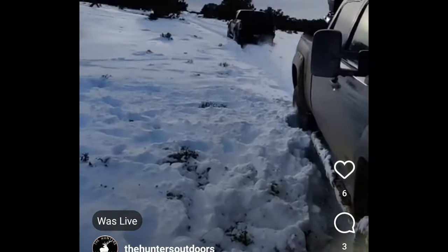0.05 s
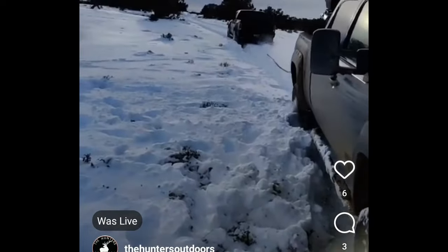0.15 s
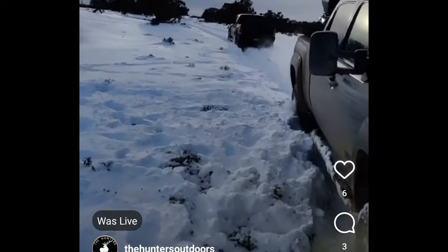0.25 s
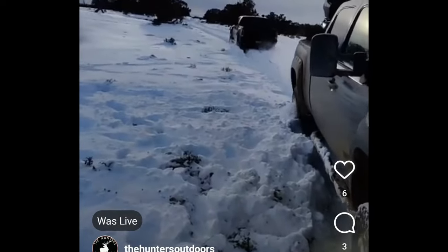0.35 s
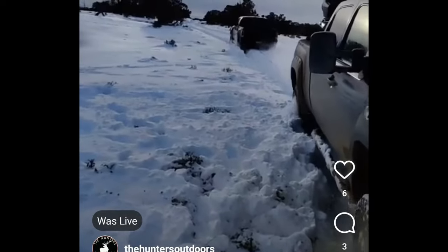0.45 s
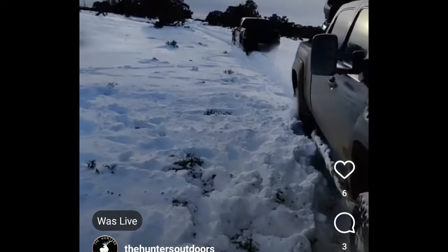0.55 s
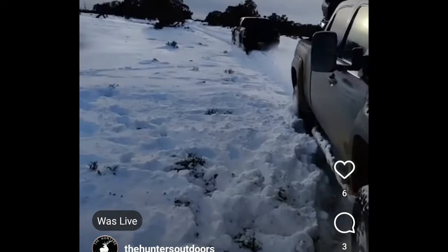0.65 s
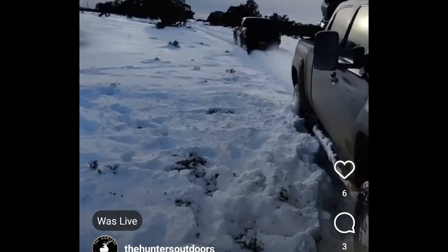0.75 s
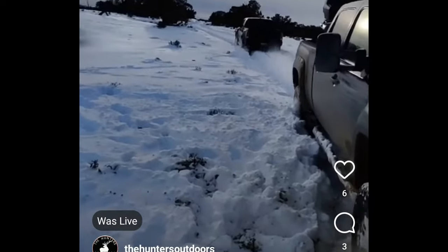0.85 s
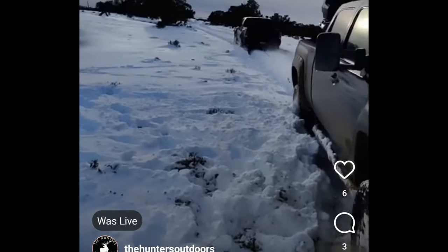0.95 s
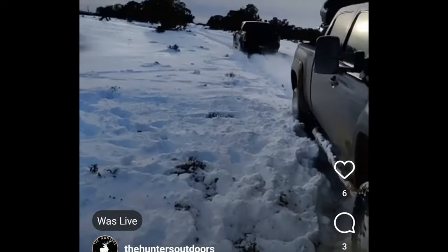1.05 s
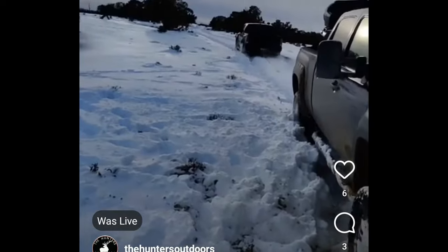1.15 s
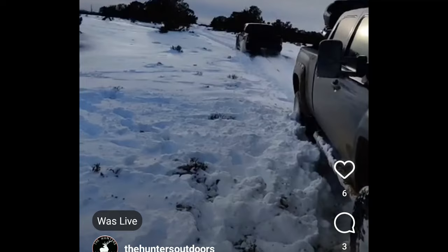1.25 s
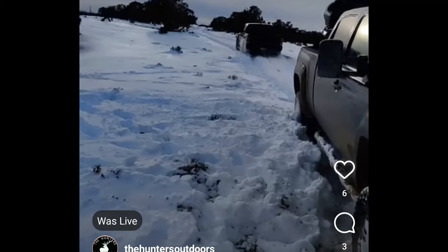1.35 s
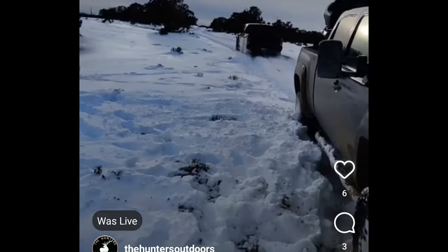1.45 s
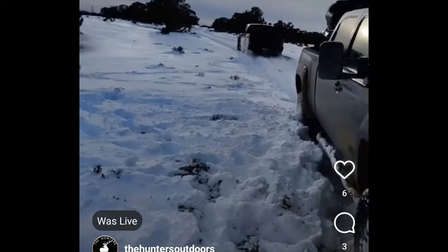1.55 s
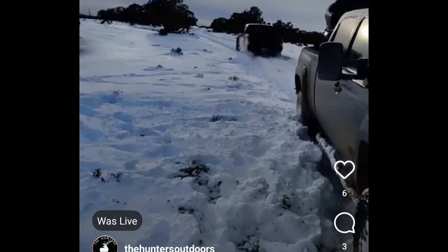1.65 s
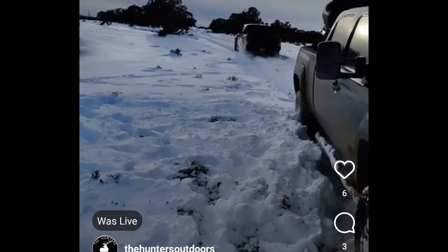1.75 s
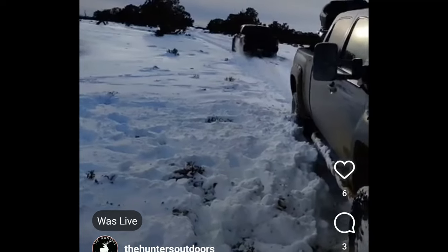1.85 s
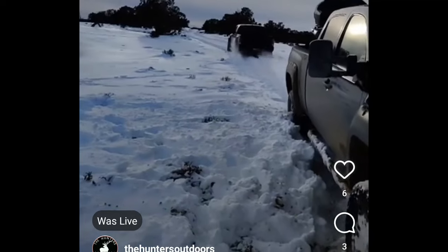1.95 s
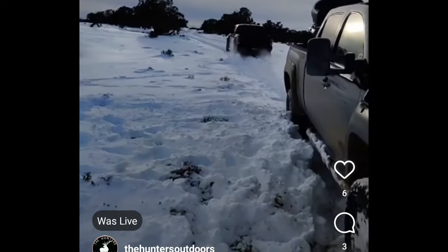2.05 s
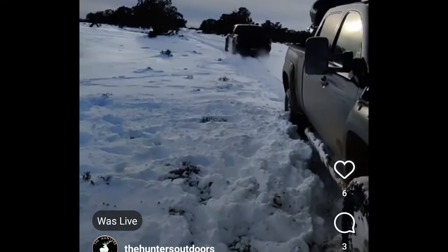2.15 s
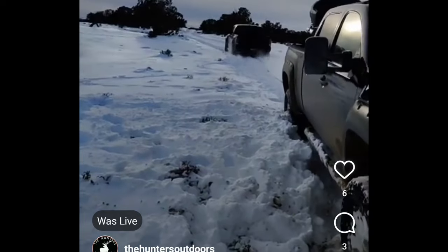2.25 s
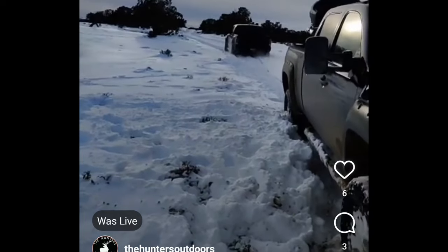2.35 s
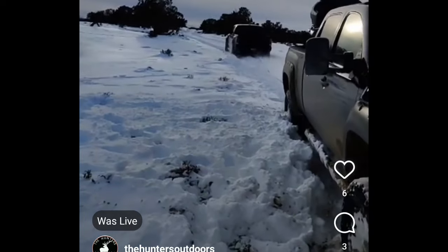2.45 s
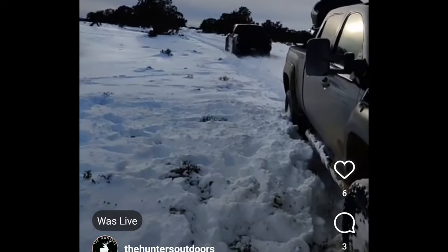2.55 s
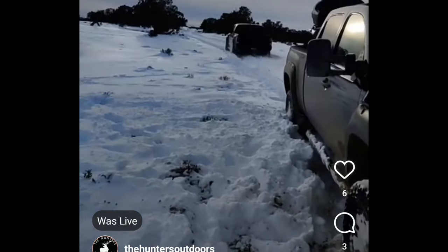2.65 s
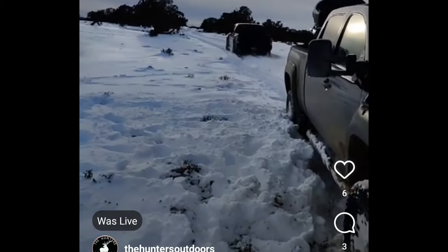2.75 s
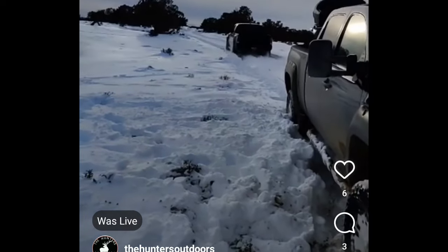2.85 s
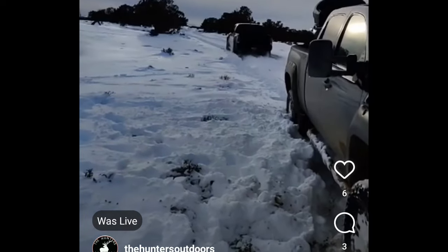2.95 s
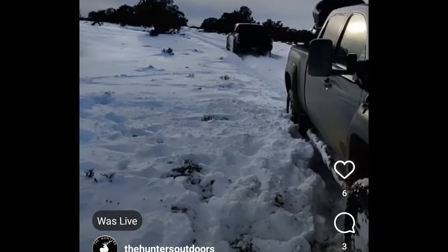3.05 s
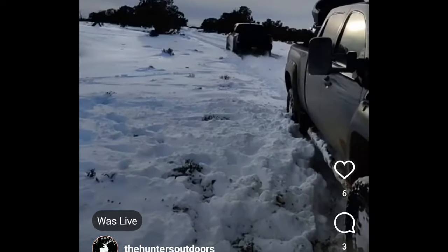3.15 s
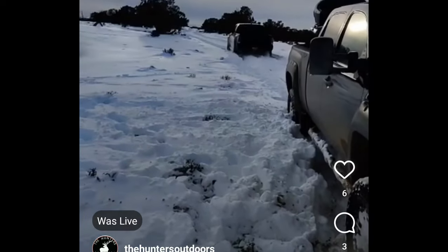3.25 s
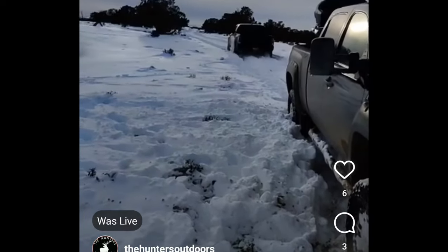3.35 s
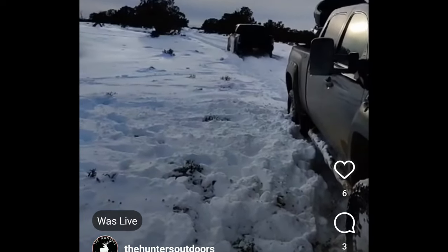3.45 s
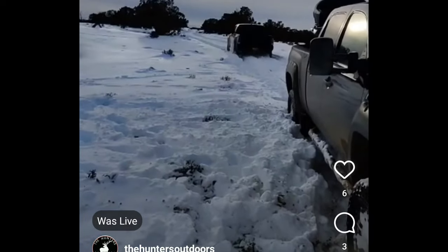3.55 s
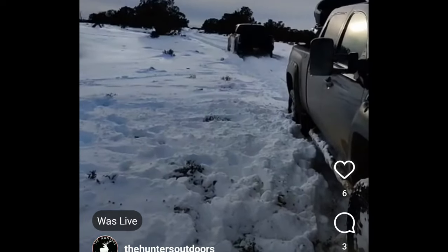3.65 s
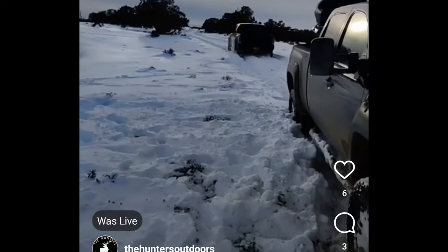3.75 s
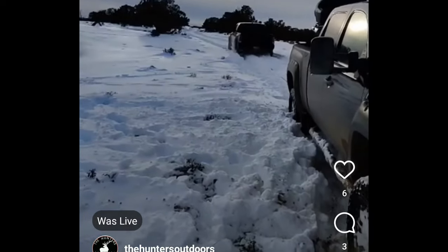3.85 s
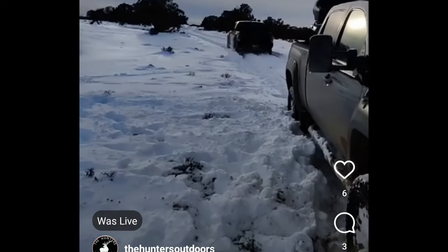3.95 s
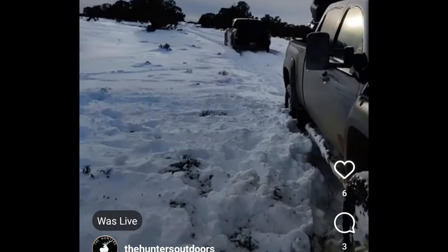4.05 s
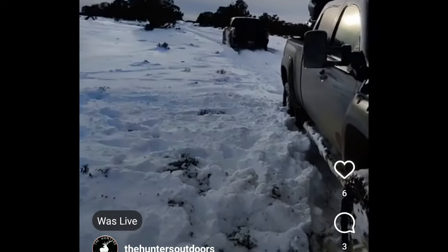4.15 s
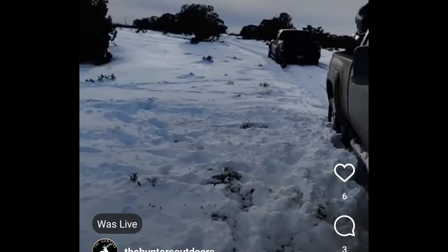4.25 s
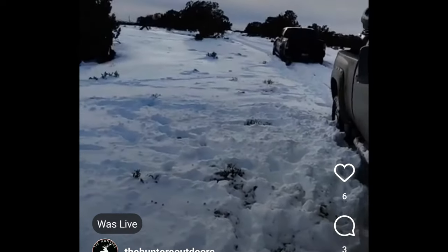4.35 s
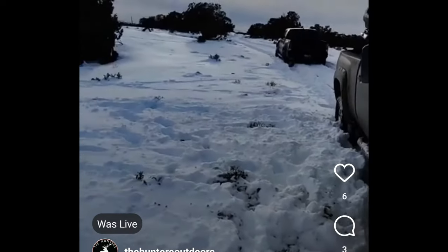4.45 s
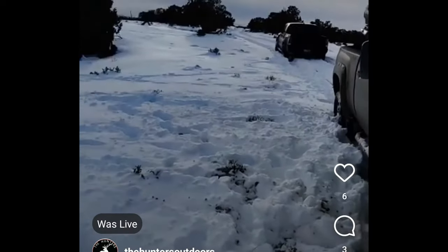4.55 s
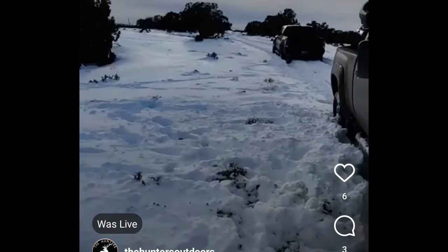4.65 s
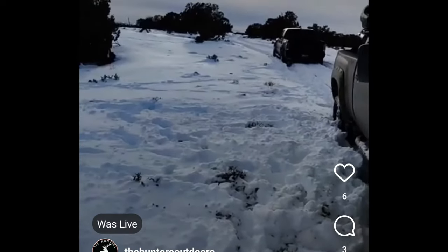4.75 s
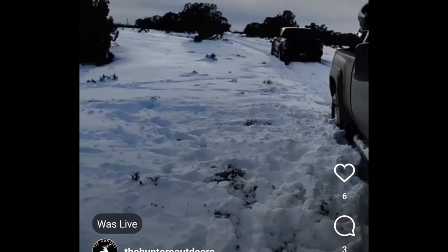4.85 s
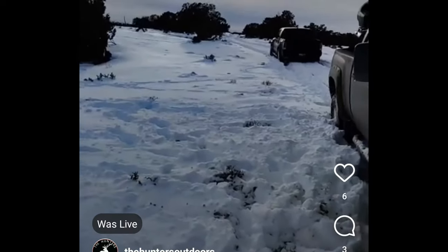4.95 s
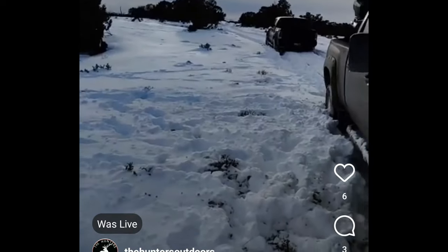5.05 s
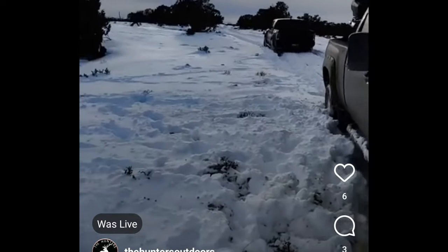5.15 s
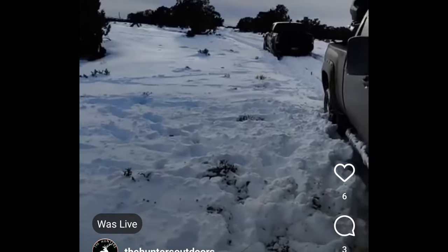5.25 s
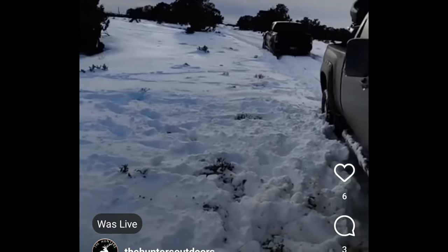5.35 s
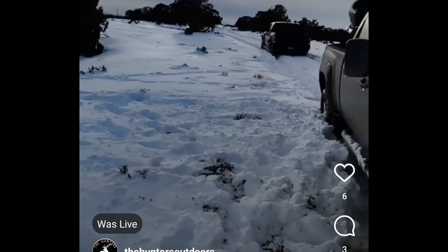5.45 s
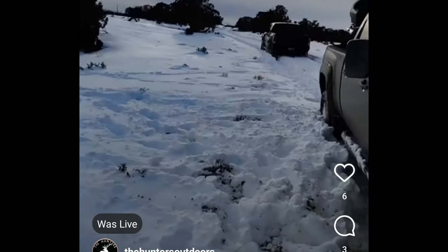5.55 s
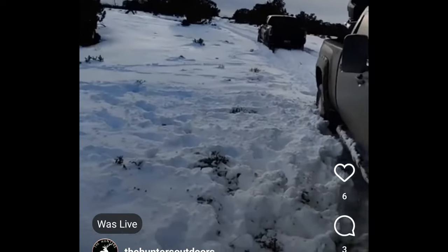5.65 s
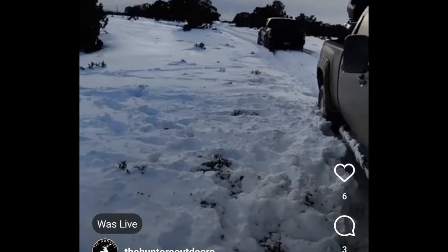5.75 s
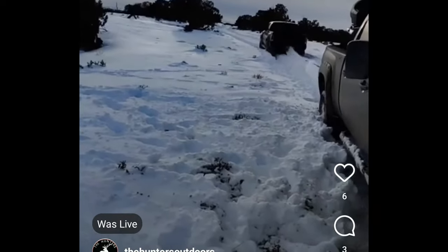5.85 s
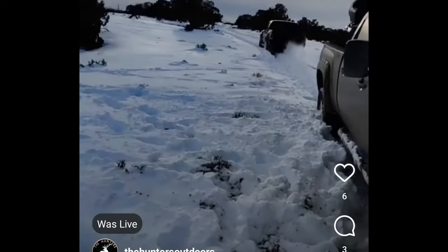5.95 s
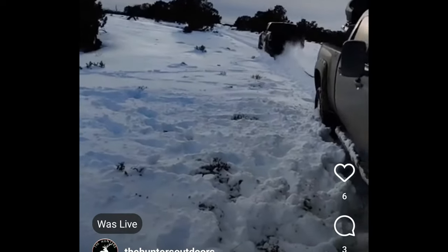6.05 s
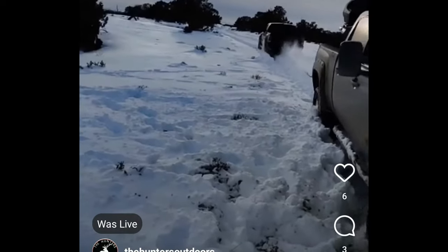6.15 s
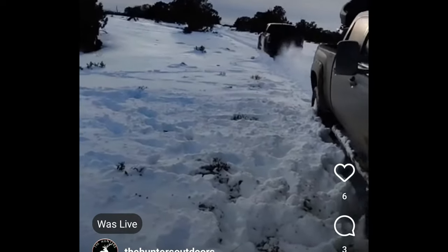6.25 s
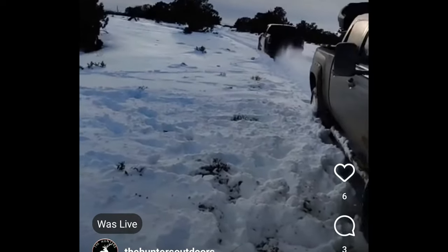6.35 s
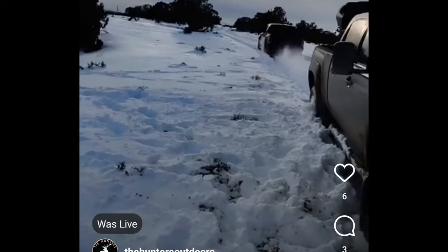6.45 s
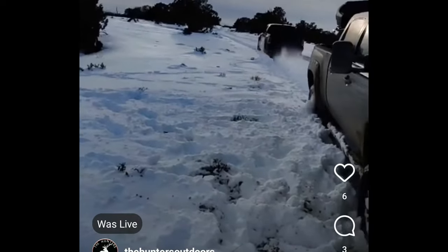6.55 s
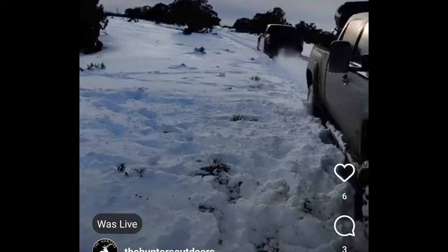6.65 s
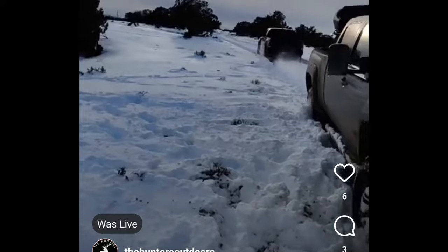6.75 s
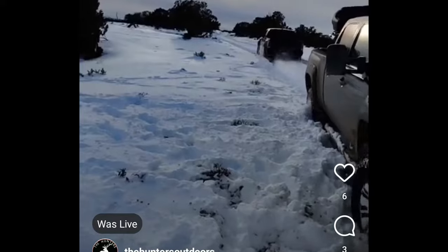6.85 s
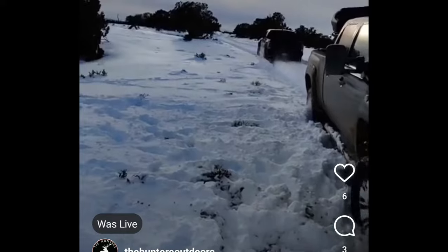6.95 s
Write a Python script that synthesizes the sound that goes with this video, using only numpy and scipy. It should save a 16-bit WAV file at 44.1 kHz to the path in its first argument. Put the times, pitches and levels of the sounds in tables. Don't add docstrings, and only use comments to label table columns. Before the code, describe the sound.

A stuck pickup revs and bogs in deep snow, tyres churning and spraying hiss, with strap clunks and wind thumps, then pulls again.

```python
import sys
import numpy as np
from scipy import signal
from scipy.io import wavfile
from scipy.ndimage import uniform_filter1d

SR = 44100
rng = np.random.default_rng(int(sys.argv[2]) if len(sys.argv) > 2 else 0)


def decibels_to_gain(level_db):
    exponent = np.asarray(level_db, float) / 20
    return 10 ** exponent


def file_out(sig):
    cols = np.atleast_2d(sig).T
    lim = np.clip(cols, -1, 1)
    pcm = np.round(lim * 32767).astype(np.int16)
    wavfile.write(sys.argv[1], SR, pcm)


N = 308788

# time in seconds, level in dB below full load.
ENGINE_LOAD = [
    [(0.0, -15), (0.16, -15), (0.3, -14), (0.5, -7.5), (1.06, 0), (1.6, 1.5), (2.4, -2), (3.0, -4),
     (3.6, -7.5), (3.95, -14.5), (4.25, -11.5)],
    [(4.254, -27), (4.55, -24), (5.29, -11), (5.92, -1.5), (6.2, -10), (6.6, -2.5), (7.0, -0.5)],
]


def evened(x):
    return x / np.sqrt(np.mean(x ** 2) + 1e-20)


def played(tables):
    s, *columns = np.vstack(tables).T
    t = np.arange(N) / SR
    return [np.interp(t, s, column) for column in columns]


def framed(table, size):
    s, *columns = np.transpose(table)
    t = np.arange(4 * N // size + 5) * size / 4 / SR
    return [np.interp(t, s, column) for column in columns]


def drift(hz):
    knots = uniform_filter1d(np.repeat(rng.standard_normal(1200), 8), size=8)
    return evened(np.interp(np.arange(N) * 16 * hz / SR, np.arange(len(knots)), knots))


def span(t0, t1, fade):
    t = np.arange(N) / SR
    return np.clip(np.minimum(t - t0, t1 - t) / fade, 0, 1)


def swells(rows):
    t = np.arange(0, N + 32, 32) / SR
    gain = 0
    for s, db, rise, fall in rows:
        gain = gain + decibels_to_gain(db - 20 * ((t - s) / np.where(t < s, rise, fall)) ** 2)
    return np.interp(np.arange(N) / SR, t, gain)


def tone(turns, db, wobble_db, wobble_hz):
    strength = decibels_to_gain(db + wobble_db * drift(wobble_hz))
    return np.sqrt(2) * strength * np.cos(2 * np.pi * (turns + rng.random()))


def gated(turns, depth):
    return evened(1 - depth + 3 * depth * np.exp(-3 * (turns % 1)))


def colour(spectrum, size):
    f, db = np.transpose(spectrum)
    bins_hz = np.fft.rfftfreq(size, 1 / SR)
    return np.interp(np.log(bins_hz + 1), np.log(f + 1), db, -90, -90)[:, None]


def bump(hz, width_hz, size):
    bins_hz = np.fft.rfftfreq(size, 1 / SR)[:, None]
    return np.exp(-((bins_hz - hz) / width_hz) ** 2)


def wavering(hz, size):
    slow = drift(0.8)[::size // 4]
    missing = 4 * N // size + 5 - len(slow)
    return hz * (1 + 0.03 * np.pad(slow, (0, missing), "edge"))


def blended(pair, size):
    # time in seconds, share of the hollow colour from 0 to 1, depth of the echo dip in dB.
    digging = [(0, 0.1, 4), (.3, 0.1, 10.5), (.7, 0.11, 1), (2.8, 0.7, -4), (3.05, 0.2, 7.5), (3.5, 0, 2),
               (3.75, .5, 10.5), (4.25, 0.5, 10), (5.2, 0.2, 12), (5.8, 0.3, -1.5), (6.05, 0.6, -3.5),
               (6.25, 1.06, -3.5), (7, 1, -7)]
    share, dip_db = framed(digging, size)
    db = colour(pair[0], size) * (1 - share) + colour(pair[1], size) * share
    steady_db = db - 10 * np.log10(np.mean(decibels_to_gain(2 * db), axis=0))
    return steady_db - dip_db * bump(2115, 355, size)


def noise(colour_db, patchy_db, streaky_db=1.0):
    size = 2 * len(colour_db) - 2
    a, b, chance = rng.standard_normal((4 * N // size + 5, len(colour_db), 3)).T
    patches = uniform_filter1d(uniform_filter1d(chance, size=8, axis=0), size=8, axis=1)
    streaks = uniform_filter1d(uniform_filter1d(chance[::-1], size=2, axis=0), size=40, axis=1)
    z = (a + 1j * b) * decibels_to_gain(colour_db + patchy_db * evened(patches) + streaky_db * evened(streaks))
    return evened(signal.istft(z, nperseg=size, noverlap=3 * size // 4)[1][:N])


def snowfield_air():
    # frequency in Hz, level in dB per Hz.
    hush = [(300, -13.5), (600, 5.5), (1200, -5.5), (2300, -7), (5300, -9.5), (7000, -16)]
    return decibels_to_gain(-66.5) * noise(colour(hush, size=1024), 1.2)


def gusts():
    # peak in seconds, level in dB, rise and fall in seconds.
    winds = [(.07, -38.5, 0.12, 0.22), (1.3, -46, .1, 0.16), (1.57, -48, 0.087, 0.28),
             (2.11, -34, 0.13, .1), (2.25, -36, 0.088, 0.16), (2.41, -33, 0.11, 0.077),
             (3.13, -39, 0.14, .3), (3.92, -46, 0.086, 0.38), (4.95, -42, 0.087, .11),
             (5.51, -48, 0.089, 0.1), (5.75, -56, 0.092, 0.11), (6.01, -29.5, 0.21, .23),
             (6.73, -36.5, 0.26, .23)]
    # peak in seconds, level in dB, rise and fall in seconds.
    lurches = [
        (.26, -43.5, 0.2, .1),
        (2.2, -41, .25, .3),
        (4.95, -44.5, 0.16, .15),
        (5.54, -34, 0.06, .06),
        (5.73, -36.5, 0.12, 0.45),
        (6.0, -52, 0.092, .1),
    ]
    # start in seconds, peak in dB, pitch in Hz, time to fade by 60 dB in seconds.
    thumps = [
        (.004, -23, 59.6, 0.23),
        (0.044, -14, 85, 0.07),
        (0.069, -21.5, 90, 0.14),
        (.115, -26, 57.5, 0.19),
        (5.48, -32, 82, 0.11),
        (5.98, -14.5, 106.6, 0.094),
        (6.036, -33, 55, 0.1),
        (6.074, -16, 98.3, 0.17),
        (6.11, -23, 85, 0.15),
    ]
    # frequency in Hz, level in dB per Hz.
    wind_spectrum = [(12, -12.5), (22, 0), (40, 5), (55, -25)]
    lurch_spectrum = [(35, -21), (50, -1), (100, -4.5), (160, -12.5), (220, -25)]
    shake_db = 0.39 * played(ENGINE_LOAD)[0]
    buffet = np.hypot(decibels_to_gain(-60 + shake_db + 2.6 * drift(1.4)), swells(winds))
    thud = np.hypot(decibels_to_gain(-46 + shake_db + 0.85 * drift(1.3)), swells(lurches))
    out = buffet * noise(colour(wind_spectrum, size=4096), 0.94)
    out = out + thud * noise(colour(lurch_spectrum, size=2048), 0.9)
    t = np.arange(8000) / SR
    onset = np.minimum(t / 0.0049, 1)
    for s, db, hz, t60 in thumps:
        out[round(s * SR):][:len(t)] += decibels_to_gain(db - 60 * t / t60) * np.sin(2 * np.pi * hz * t) * onset
    return out


def gear():
    # time in seconds, pitch in Hz, level in dB.
    mesh = [(.15, 532, -68), (.5, 555, -62), (1.0, 564, -65.5), (1.7, 575, -70), (2.0, 545, -58.5),
            (2.3, 556, -54.5), (2.9, 509, -64.5)]
    hz, db = played([mesh])
    return tone(np.cumsum(hz) / SR, db, 2.0, 4.1) * span(0.073, 3.02, 0.1)


def hum():
    # time in seconds, pitch in Hz, level in dB.
    drone = [(.3, 125, -53.5), (1.4, 124.5, -49), (2.9, 120.2, -48.5), (6.3, 133.1, -55), (7, 129.5, -49)]
    hz, db = played([drone])
    return tone(np.cumsum(hz) / SR, db, 1.0, 5.4) * (span(0.085, 2.79, 0.15) + span(6.45, 6.5, 0.15))


def far_engine():
    # time in seconds, firing rate in Hz, boom level in dB.
    towing = [
        [(0.0, 96, -25), (0.12, 95, -45.5), (0.3, 96, -54), (0.58, 98, -49), (0.92, 97.2, -51),
         (1.49, 94.8, -38.5), (1.66, 90, -49), (1.84, 80.5, -45), (2.0, 77.3, -47.5)],
        [(3.8, 96.94, -46.5), (4.25, 98, -44.5)],
        [(6.15, 98.4, -43), (6.37, 104, -46), (6.55, 107, -45.5), (7.0, 116, -42.5)],
    ]
    # multiple of the firing rate, level in dB.
    multiples = [(2 / 3, -11), (1, 0), (8 / 3, -12), (10 / 3, -11), (4, -20.5)]
    hz, db = played(towing)
    turns = np.cumsum(hz * (1 + 0.0047 * drift(12))) / SR
    orders = sum(tone(k * turns, db + rel_db, 1.7, 7) for k, rel_db in multiples)
    return orders * (span(0, 2.2, 0.17) + span(3.75, 4.254, 0.027) + span(6.15, 7.1, 0.2))


def turbo():
    # time in seconds, pitch in Hz, level in dB.
    whine = [(2.05, 2100, -63), (2.2, 2206, -61.5), (2.4, 2185, -58.5), (2.6, 2120, -58.5),
             (3.2, 1937, -62)]
    hz, db = played([whine])
    turns = np.cumsum(hz * (1 + 0.0039 * drift(40))) / SR
    return tone(turns, db, 3.0, 23) * span(1.9, 3.2, 0.072)


def knocks():
    # time in seconds, peak in dB, rattle length in seconds, lowest ring in dB.
    blows = [
        (0.089, -25, 0.043, -10),
        (1.975, -50, 0.018, -5),
        (2.039, -24.5, 0.035, -6),
        (3.568, -36, 0.031, -8),
        (6.016, -13.5, 0.14, 1),
        (6.885, -26, 0.024, 2),
    ]
    # ringing pitch in Hz, level in dB, time to fade by 60 dB in seconds.
    chassis = [(679, -4, 0.054), (1260, 3.5, 0.012), (1693, 7, 0.011), (2107, 0.5, 0.018),
               (2440, -6.5, .01), (3380, -2, 0.011), (4440, -5, 0.0037), (4800, -7.5, 0.009)]
    out = np.zeros(N + SR)
    t = np.arange(6000) / SR
    modes = []
    for k, (hz, db, t60) in enumerate(chassis):
        modes.append((-1) ** k * decibels_to_gain(db - 60 * t / t60) * np.sin(2 * np.pi * hz * t))
    for s, db, length, body_db in blows:
        ring = decibels_to_gain(body_db) * modes[0] + sum(modes[1:])
        ring[0] += 2.5
        fade = np.exp(-t / 0.016 - (t / length) ** 6)
        rattle = rng.standard_normal(len(t)) * fade * np.minimum(t / 0.0049, 1)
        knock = signal.fftconvolve(rattle, ring)
        out[round((s - 0.004) * SR):][:len(knock)] += decibels_to_gain(db - 4.0) * knock / abs(knock).max()
    return out[:N]


def tyres(turns):
    # time in seconds, level in dB below full spin.
    wheel_spin = [
        [(0.0, -10.5), (0.14, -3.5), (1.1, -0.5), (1.87, -4), (2.6, -2), (3.05, -6), (3.52, -2.5), (3.81, -7),
         (4.1, -12.5), (4.25, -9)],
        [(4.254, -28.5), (4.47, -21), (4.77, -12), (5.31, -5), (5.83, -3), (6.14, -3.5), (6.7, 0), (7.0, 0.5)],
    ]
    # frequency in Hz, level in dB per Hz.
    churned = [
        [(590, -23.5), (1000, 0), (1250, -1), (1740, -2), (2210, -7), (2300, -10), (2990, -43.5), (5060, -120)],
        [(590, -43.5), (1000, -10), (1250, -3), (1660, 1), (1830, -4.5), (1990, -15.5), (2300, -24.5), (2990, -46.5), (5060, -120)],
    ]
    thrown = [
        [(1350, -45), (2300, -9), (2450, -4.5), (3070, -2), (3540, -3), (4110, 0), (4680, -3), (5130, -3), (6240, -14.5), (8110, -43.5), (13700, -120)],
        [(1350, -36.5), (2300, -13), (2980, 0.5), (3230, -7.5), (3630, -8.5), (4340, -8), (4900, -12), (5170, -7), (5440, -7.5), (6240, -17.5), (8110, -51), (13700, -120)],
    ]
    # frequency in Hz, level in dB per Hz.
    fizzing = [(6900, -10), (7900, -11), (8450, -4), (8700, -15), (10350, -17), (12400, -14),
               (13200, -13.5), (13800, 2), (14300, -17.5), (15600, -11), (15750, -32)]
    spin_db = played(wheel_spin)[0]
    churn_db = -44.5 + spin_db
    spray_db = -49.5 + 0.61 * spin_db + 0.29 * played(ENGINE_LOAD)[0]

    churn_colour_db = blended(churned, size=1024) + 3.2 * bump(wavering(1648, size=1024), 69, size=1024)
    grains = rng.random(N) * (rng.random(N) < 90 / SR)
    crunch = 1 + 0.28 * signal.lfilter([1], [1, -np.exp(-1 / (0.0035 * SR))], grains)
    flicker = decibels_to_gain(0.12 * drift(12) + 0.4 * drift(70))
    bite = evened(flicker * crunch * gated(turns, 0.016))
    churn = decibels_to_gain(churn_db + 3.0) * noise(churn_colour_db, 0.51, 2.7)

    slack_db = np.maximum(-5.5 - 1.1 * framed(np.vstack(wheel_spin), size=512)[0], 0)
    powder_loss_db = np.minimum(1.5 * slack_db, 11) * bump(6200, 590, size=512)
    spray = decibels_to_gain(spray_db + 2.0) * noise(blended(thrown, size=512) - powder_loss_db, 0.91, 1.52)
    fizz = decibels_to_gain(spray_db - 29 + 1.6 * drift(0.97)) * noise(colour(fizzing, size=512), 2.8, 2.3)
    return bite * (churn + spray), bite * fizz


def engine_noise(turns):
    # frequency in Hz, level in dB per Hz.
    exhaust = [(72, -16), (103, -2), (209, -7), (247, -4), (302, -7.5), (366, -8.5), (466, -17),
               (520, -19.5), (680, -42), (1140, -120)]
    fan = [(280, -41), (480, -22.5), (599, -5), (769, 1.5), (881, 3), (1010, -5.5), (1100, -1.5),
           (1430, -38.5), (2420, -120)]
    load_db = played(ENGINE_LOAD)[0]
    fan_colour_db = colour(fan, size=1024) + 2.44 * bump(wavering(815, size=1024), 77, size=1024)
    rumble_gain = decibels_to_gain(-36.5 - 3.5 + 0.52 * load_db + 0.62 * drift(1.54))
    rumble = rumble_gain * noise(colour(exhaust, size=2048), 1.4)
    roar_gain = decibels_to_gain(-42 + load_db + 0.68 * drift(1.57)) * gated(turns, 0.066)
    return rumble + roar_gain * noise(fan_colour_db, 0.96, 1.65)


def near_engine():
    # time in seconds, firing rate in Hz.
    firing = [
        [(1.85, 62.5), (2.1, 72.47), (2.42, 83.67), (2.62, 87.23), (2.8, 82.87), (2.98, 64.5), (3.12, 74),
         (3.45, 83.9), (3.67, 78.2), (3.85, 56.4), (4.05, 45.84), (4.25, 54)],
        [(4.254, 75.8), (4.48, 88.6), (5.03, 93), (5.57, 88.7), (5.66, 72), (5.85, 67.03), (5.96, 78.75),
         (6.26, 68.25), (6.66, 94.8), (6.85, 96.2)],
    ]
    # peak in seconds, level in dB, rise and fall (to 20 dB down) in seconds.
    stab_rows = [
        (2.11, -26, 0.26, 0.34),
        (2.9, -39, 0.017, 0.044),
        (3.12, -23, .12, 0.23),
        (3.85, -36.5, 0.054, 0.19),
        (4.24, -25.5, .27, 0.02),
        (5.48, -35.5, 0.13, 0.16),
        (5.97, -19.5, 0.085, 0.086),
        (6.096, -26.5, .06, 0.1),
    ]
    # peak in seconds, level in dB, rise and fall in seconds.
    lugs = [
        (5.0, -54.5, .8, 0.79),
        (6.56, -44, .45, 0.41),
    ]
    hz = played(firing)[0]
    load_db = 0.35 * played(ENGINE_LOAD)[0]
    stabs = swells(stab_rows)
    turns = np.cumsum(hz * (1 + 0.0067 * drift(25))) / SR

    pipe_db = 12.5 * np.exp(-((2 * hz - 163.2) / 11) ** 2)
    first_gain = np.hypot(decibels_to_gain(-42.5 + load_db), stabs)
    second_gain = np.hypot(decibels_to_gain(-55 + load_db + pipe_db), decibels_to_gain(-21) * stabs + swells(lugs))
    first = first_gain * tone(turns, 0, 1.4, 30) * span(1.85, 6.3, 0.17)
    second = second_gain * tone(2 * turns, 0, 0.85, 6.5) * span(1.7, 6.9, 0.18)
    return first + second, turns


def ragged(x):
    hz, t, z = signal.stft(x, SR, nperseg=1024)
    low, high = np.repeat(rng.standard_normal((len(t), 2)), repeats=5, axis=0)[:len(t)].T
    edge_hz = 6510 + 200 * low
    top_hz = 6860 + 150 * np.maximum(high, 0) ** 2
    hole = np.clip(np.minimum(hz[:, None] - edge_hz, top_hz - hz[:, None]) / 60, 0, 1)
    return signal.istft(z * decibels_to_gain(-21.5 * hole), SR, nperseg=1024)[1][:N]


def scene():
    boom, turns = near_engine()
    snow, fizz = tyres(turns)
    clunks = knocks()
    trucks = boom + far_engine() + hum() + gear() + turbo() + engine_noise(turns)
    mix = trucks + snow + gusts() + clunks + snowfield_air()
    treble_cut = signal.firwin(151, 6700, window=("kaiser", 4.5), fs=SR)
    narrow = signal.oaconvolve(mix, treble_cut, "same")
    left = decibels_to_gain(5) * ragged(narrow + fizz + decibels_to_gain(-28.5) * clunks)
    return np.array([left, np.zeros(N)])


def top_cut(x):
    return signal.sosfilt(signal.butter(12, 15750, fs=SR, output="sos"), x)


def record(dry):
    return top_cut(dry)


dry = scene()
out = record(dry)
file_out(out)
```